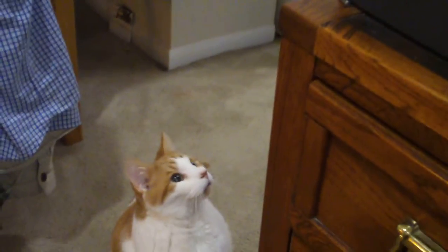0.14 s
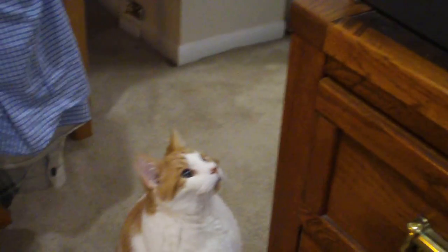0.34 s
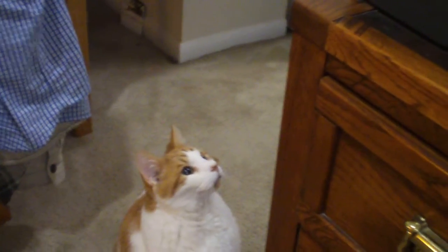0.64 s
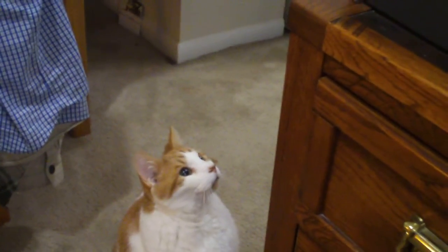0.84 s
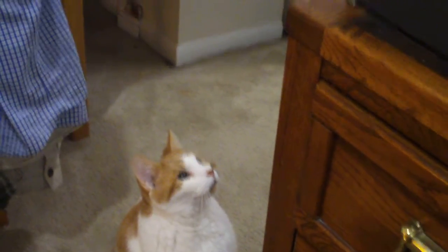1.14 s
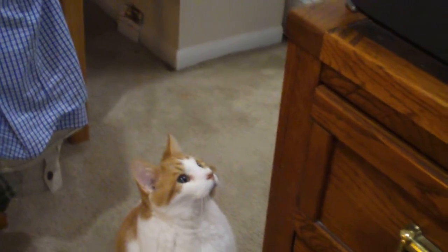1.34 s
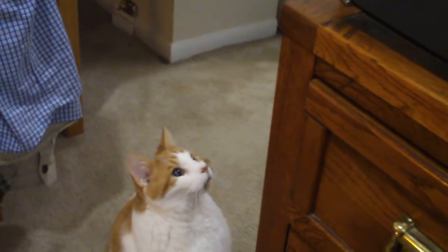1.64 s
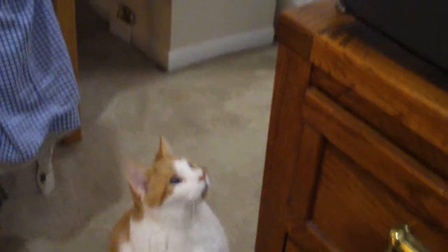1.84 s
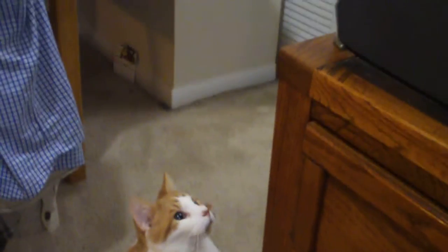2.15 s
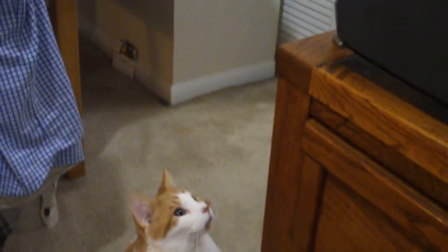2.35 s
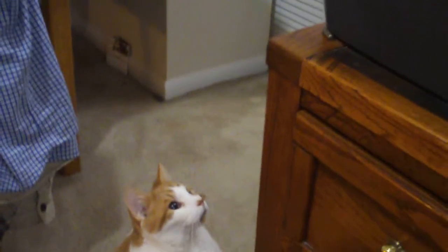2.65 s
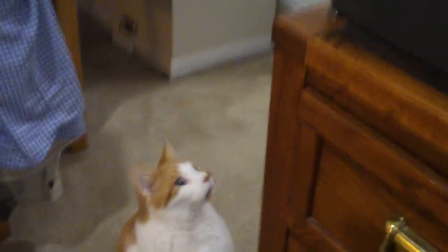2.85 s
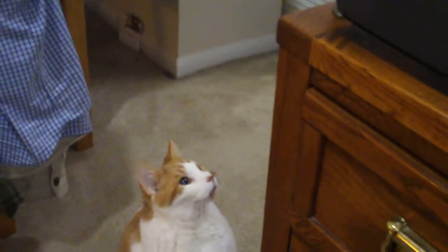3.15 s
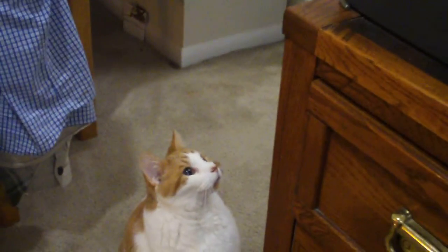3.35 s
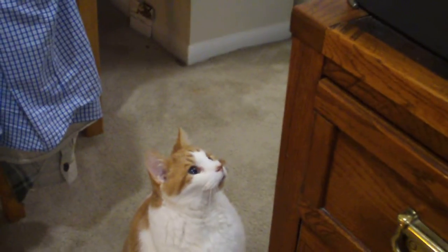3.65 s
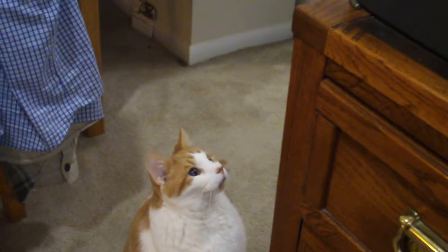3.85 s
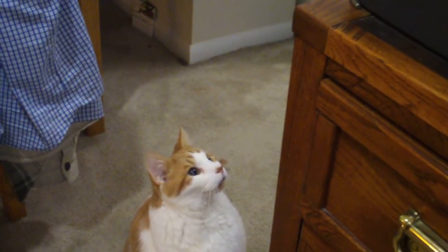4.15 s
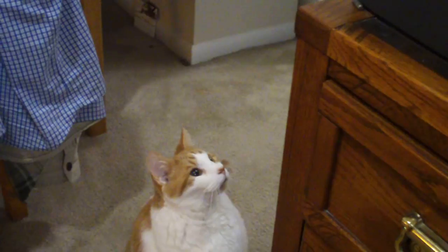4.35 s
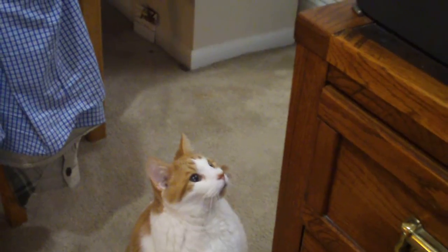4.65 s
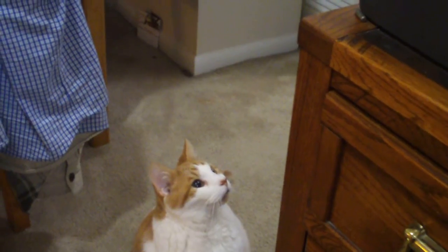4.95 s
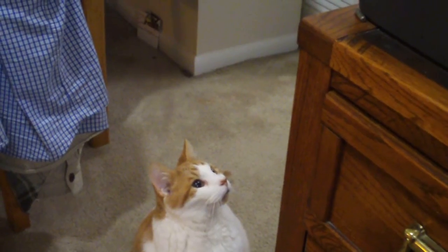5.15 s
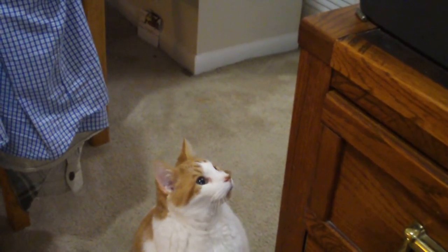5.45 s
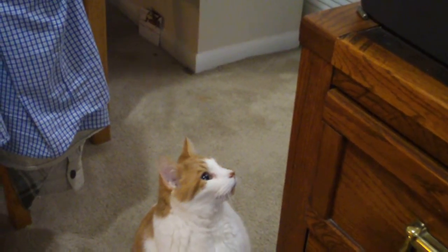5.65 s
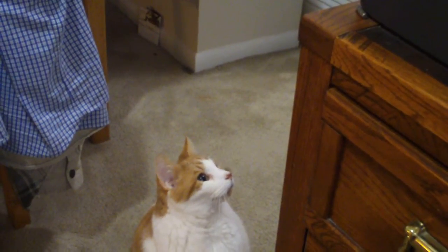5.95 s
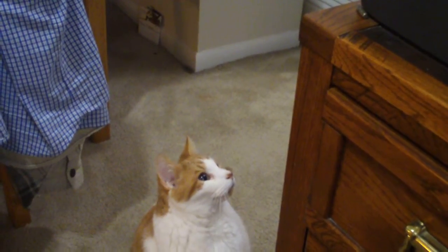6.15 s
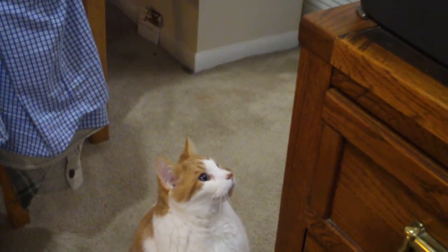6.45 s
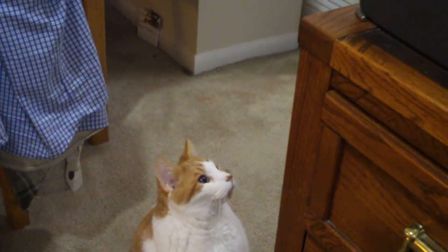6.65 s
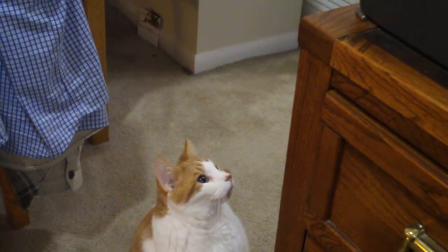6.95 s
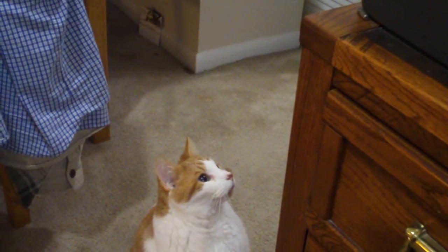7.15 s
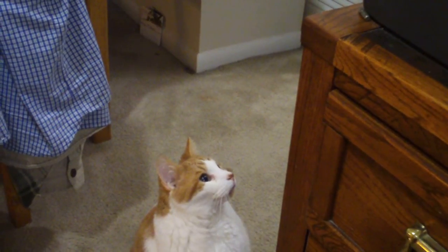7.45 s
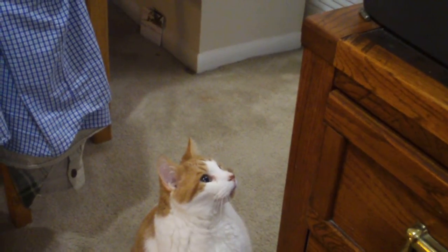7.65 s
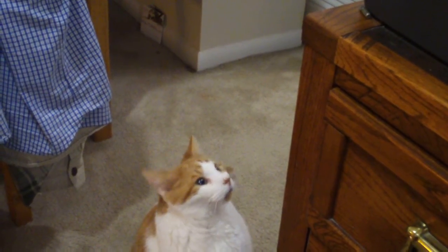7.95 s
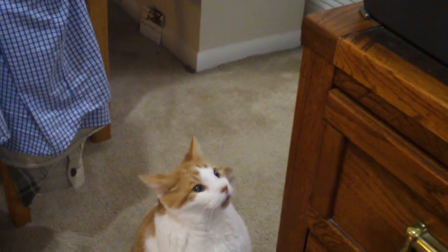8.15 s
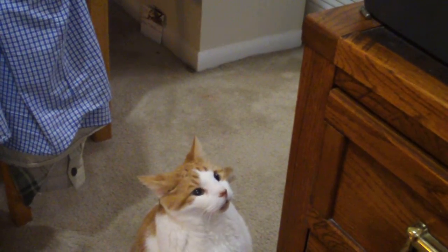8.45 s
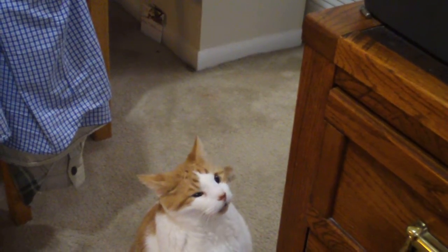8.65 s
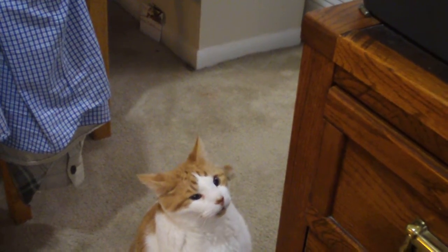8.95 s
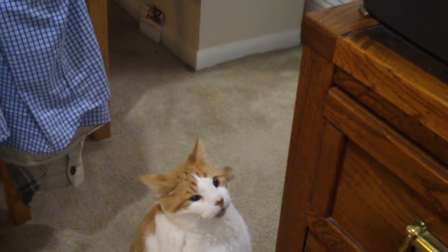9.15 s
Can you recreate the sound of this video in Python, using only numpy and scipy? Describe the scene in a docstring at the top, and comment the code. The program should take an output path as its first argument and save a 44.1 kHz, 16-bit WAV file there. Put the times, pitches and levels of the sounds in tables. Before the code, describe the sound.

A printer feeds a page indoors over constant low hum and air. Latches clack first alone, then along with a geared whir and rustling paper; brief motor jerks follow. After a longer hissing feed, a small part bounces and sharp plastic snaps peak, leaving loose parts rustling. A faint squeak and another feed lead to quiet cam scraping. The microphone is fairly near, the sound centred, the room dry.

```python
"""A low rumble and a steady fan hum fill a carpeted room, then a printer works through a page. Latches and
engaging gear teeth click as bursts of noise ringing in plastic; each blow leaves a short rustle of loose parts.
A geared feed motor makes short steps and three longer runs: hum, whine, rattle and paper hiss follow its speed.
Filtered bursts make the gear train's knocks, shaped noise makes brushing paper and turning cams. A pawl bounces
on a ringing bracket, and a roller squeaks once in gliding, fluttering partials."""
import sys
import numpy as np
from scipy import signal
from scipy.fft import rfft, irfft
from scipy.io import wavfile
from scipy.ndimage import uniform_filter1d

SR = 44100
rng = np.random.default_rng(int(sys.argv[2]) if len(sys.argv) > 2 else 0)


def generate_wav(signal):
    """Clip the signal to [-1, 1] and save it as 16-bit WAV at the path in sys.argv[1]."""
    frames = np.transpose(np.atleast_2d(signal))
    scaled = np.clip(frames, -1, 1) * 32767
    pcm = np.round(scaled).astype(np.int16)
    wavfile.write(sys.argv[1], SR, pcm)


N = 409688
TIME = np.arange(N) / SR  # seconds
BINS_HZ = np.fft.rfftfreq(N, 1 / SR)


def amp(db):
    """Decibels to gain."""
    return 10 ** (np.asarray(db) / 20)


def unit(x):
    """Scales to rms 1."""
    return x / np.sqrt(np.mean(x ** 2) + 1e-20)


def read(points, hz):
    """Reads a curve of (Hz, value) points on a log-frequency axis."""
    f, value = np.transpose(points)
    return np.interp(np.log(hz + 1), np.log(f + 1), value)


def add(mix, s, sound):
    """Mixes a sound in at time s."""
    part = mix[max(round(s * SR), 0):][:len(sound)]
    part += sound[:len(part)]


def noise(spectrum):
    """Noise of rms 1 with the given colour."""
    white = rfft(rng.standard_normal(N))
    return unit(irfft(white * amp(read(spectrum, BINS_HZ)), N))


def drift(rate_hz):
    """Random fluctuation of rms 1 around zero, changing up to about the given rate."""
    white = rfft(rng.standard_normal(N))
    return unit(irfft(white * (BINS_HZ > 0) / (1 + (BINS_HZ / rate_hz) ** 4), N))


def causal(gain_db):
    """Impulse response of energy 1 with this gain curve and no sound before the blow."""
    log_gain = np.log(amp(np.r_[gain_db, gain_db[-2:0:-1]]))
    minimum_phase = np.exp(np.conj(signal.hilbert(log_gain)))
    ring = np.fft.ifft(minimum_phase).real[:len(gain_db)]
    return ring / np.linalg.norm(ring)


def peaks(modes, hz):
    """Gain in dB of a set of resonances."""
    return sum(db / (1 + (2 * (hz - f) / width) ** 2) for f, width, db in modes)


def housed(x, modes, size=4096):
    """Passes a sound through a set of resonances."""
    gain_db = peaks(modes, np.fft.rfftfreq(size, 1 / SR))
    return signal.fftconvolve(x, causal(gain_db))[:N]


def chatter(t60, rise, size=8192):
    """Loose parts meet in a quickly dying spray of tiny, unequal impacts."""
    t = np.arange(size) / SR
    grain_db = 1.8 * unit(uniform_filter1d(rng.standard_normal(size), size=40))
    spray = unit(rng.standard_normal(size) * amp(grain_db))
    attack = 1 - np.exp(-t / max(rise, 1e-4))
    return spray * attack * np.exp(-np.log(1000) * t / max(t60, .01))


# Colours of the room's rumble and of the fan air. Each row: frequency in Hz, relative level in dB per Hz.
RUMBLE_COLOUR, AIR_COLOUR = [(8.8, -39), (15, -8), (27, 6.5), (56, 0.5), (70, -2.5), (87, -3.5), (113, -8),
                             (152, -7), (172, -4.5), (185, -13.5), (240, -15), (410, -120)], [(130, -45), (220, -0.5), (331, -10.5), (507, -10.5),
                                             (585, -15.5), (800, -18), (1010, -18.5), (1230, -20.5),
                                             (1700, -23.5), (2250, -25), (2950, -26), (4900, -32.5),
                                             (6200, -33), (7000, -36), (7980, -34.5), (8570, -39.5),
                                             (12900, -31.5), (15400, -48.5)]
# Slow ebb and swell of both. Each row: time in seconds, change of level in dB.
RUMBLE_SWELL, AIR_SWELL = [(0, -0.5), (1.5, 1.5), (3, 0), (4.2, 0.5), (6.6, 1), (7.3, 0), (7.8, 2.5),
                           (8.3, 0), (9.3, 0.5)], [(0, 1), (.8, -1), (1.9, 0.5), (2.05, 1), (2.6, -0.8),
                                                 (4.4, 0), (4.85, -1), (6, -0.5), (9.3, 0.1)]
# Stereo width of rumble and air. Each row: frequency in Hz, side over mid in dB.
AIR_WIDTH = [(25, -27), (100, -21.5), (300, -50), (1000, -69), (4000, -29), (13000, -27)]
# Steady tones of mains and fan. Each row: pitch in Hz, level in dB, rms wander of the pitch in Hz.
HUM_TONES = [(38.1, -44, 0.79), (58.9, -40, 0.983), (119.3, -51.5, 0.48), (141.2, -52, 0.44),
             (201.8, -39.5, 0.44)]
# Thin, steady whistles of the electronics: a list of pitches in Hz, and a list of levels in dB.
WHISTLE_HZ, WHISTLE_DB = [7866, 13000], [-62, -74]
RUMBLE_DB, AIR_DB = -34.5, -42  # before the swells


def background(waver_db=1.33):
    """Rumble and fan air are swelling noise, nearly the same on both sides; hum and whistles are centred sines."""
    rumble_db = RUMBLE_DB + np.interp(TIME, *np.transpose(RUMBLE_SWELL))
    air_db = AIR_DB + waver_db * drift(12) + np.interp(TIME, *np.transpose(AIR_SWELL))
    mid, side = (amp(rumble_db) * noise(RUMBLE_COLOUR) + amp(air_db) * noise(AIR_COLOUR) for _ in range(2))
    side = irfft(rfft(side) * amp(read(AIR_WIDTH, BINS_HZ)), N)
    for hz, db, wander_hz in HUM_TONES:
        turns = np.cumsum(hz + wander_hz * drift(1.4)) / SR
        mid += amp(db + 1.0 * drift(1.8)) * unit(np.sin(2 * np.pi * turns))
    for hz, db in zip(WHISTLE_HZ, WHISTLE_DB):
        mid += amp(db) * unit(np.sin(2 * np.pi * hz * TIME))
    return np.array([mid + side, mid - side])


# Broad colour of struck plastic. Each row: frequency in Hz, relative level in dB per Hz.
PLASTIC_COLOUR = [(120, -23.5), (270, 17.5), (450, 9.5), (750, 3.5), (1200, 6), (1900, -2.5), (3000, -1.5),
                  (5000, -2), (8000, -4.5), (11000, -8), (15000, -18)]
# Modes of the case. Each row: frequency in Hz, width in Hz, rise over the broad colour in dB.
CASE_MODES = [(1140, 50, 1.5), (1600, 150, 5.6), (2150, 130, 4.5), (2450, 90, 3.4), (3200, 250, 0.62),
              (5640, 120, 1.9), (6590, 110, 5.7), (9870, 320, 6.1)]
CLICK_T60_S, LINGER = 0.037, 8.5  # a slower contact rings longer, by LINGER times its attack
RING_Q = 12.5  # sharpness of the part's own ring


def click(bright_db, body_db, ring_hz, rise, ring_db, size=2048):
    """A plastic part rings at its own pitch and through the case, with body and treble raised or lowered."""
    hz = np.fft.rfftfreq(size, 1 / SR)
    case = read(PLASTIC_COLOUR, hz) + peaks(CASE_MODES, hz)
    low = 1 / (1 + (hz / 1600) ** 4)
    high = 1 - 1 / (1 + (hz / 5500) ** 4)
    own_ring = ring_db / (1 + (2 * RING_Q * (hz / ring_hz - 1)) ** 2)
    colour = case + low * body_db + high * bright_db + own_ring
    return signal.fftconvolve(chatter(CLICK_T60_S + LINGER * rise, rise), causal(colour))


# Latches, levers, and gear teeth clacking as the motor engages. Each row: start in seconds, level in dB,
# brightness in dB, body in dB, # the part's own ring in Hz, attack time constant in seconds, its sustain in dB
# against the blow.
PART_CLICKS = [(.675, -28.5, 0, -6, 5340, .0011, -19), (1.099, -27.5, -20, -8, 1140, 0.0029, -20),
               (1.316, -19, -6, -8.5, 1400, 0.0026, -24), (1.402, -22, -17, -20, 2360, .0002, -20),
               (1.495, -23, 5, -19, 5700, 0.0024, -20), (1.715, -29.5, -15, -6, 1000, 0.0026, -2),
               (2.952, -27, -3, -11, 6200, .0011, -16), (3.01, -33.5, -11, -1, 3300, .003, -18),
               (3.155, -36, -9, -2, 3420, .0032, -6), (3.195, -32, -3, 0, 2100, 0.0041, -20),
               (3.2241, -26.5, -11, -5, 3530, 0.0016, -16), (3.2773, -24.5, -18, -8, 1280, .0036, -24),
               (3.407, -37, -20, -5, 2240, .004, -20), (3.536, -30, -2, -8, 4160, 0.0046, -14),
               (3.5448, -22.5, -19, -9, 1470, .003, -8), (3.891, -31.5, -5, -6, 2830, .0022, -20),
               (4.5923, -32.5, -9, -8, 5500, 0.00091, -20), (5.3423, -23.5, -9, -13, 1580, .00025, -7),
               (5.348, -28, -20, -8, 1100, .005, 7), (5.398, -29, -16, -13, 1600, .002, -16),
               (5.502, -18.5, -9, -6, 2280, 0.0011, -12), (6.096, -33.5, -14, -8, 2120, .002, -14),
               (6.362, -41, -15, -19, 4030, .0015, -20), (6.4563, -31.5, 4, -5, 1110, .004, -24),
               (6.466, -24.5, 3, -8, 4490, .002, -12), (6.474, -20.5, -20, -1, 990, .0034, -22),
               (6.716, -33, -15, -22, 2530, 0.0043, -18), (6.8693, -32, 7, -1, 3750, .0006, -14),
               (7.005, -25.5, 3, -3, 10000, 0.0029, -22), (7.0889, -25, 3, -3, 4930, 0.0029, -26),
               (7.0978, -18, 2.5, -11.5, 6790, 0.0032, -9), (7.1089, -25.5, -10, -7, 3050, 0.0066, -19),
               (7.162, -33, -13, -4, 2900, .003, -20), (7.2437, -30, 4, -3, 1200, 0.00091, -22),
               (7.255, -17, 0, -11, 10000, 0.0026, -20), (7.2688, -11, 2.5, -8.5, 6760, .00055, -15),
               (7.3446, -26, -7, -5, 1010, 0.0052, -20), (7.392, -34.5, -8, -10, 5000, .003, -18),
               (7.539, -40, -15, -14, 4800, .002, -18), (7.621, -28, 5, 7.5, 2070, 0.0044, -7),
               (7.651, -38, -9, -6, 2220, 0.0027, -18), (7.742, -34.5, -8, -16, 5540, 0.0052, -18),
               (7.815, -38.5, -1, -4, 6350, .002, -20), (7.87, -30, 3, -12, 6800, .0006, -10),
               (7.9328, -21.5, -7, -4.5, 2530, .0034, -18), (7.9413, -22.5, 6, -3, 6640, 0.0011, -20),
               (8.0172, -24.5, -9, -8, 5520, 0.0027, -9), (8.181, -31.5, -8, -1, 3080, 0.0032, -14),
               (8.287, -20, -7, -5.5, 2400, 0.0038, -23), (8.3826, -19.5, -22, -17, 1620, .0005, -16),
               (8.442, -35, -12, -12, 2380, .001, -16), (8.477, -31, -12, -12, 1900, .001, -16)]
SUSTAIN_T60_S, SUSTAIN_FALL = 0.092, .3  # decay at 1 kHz; exponent by which higher parts die sooner
RING_DB, RING_FALL = 5, 0.15  # ring in a blow of 0 dB; dB gained for each dB that the blow is lighter


def clicks(size=8192):
    """Latches and levers snap into place and gear teeth clack as the motor engages; the springier parts ring on
    as a decaying sine."""
    out, t = np.zeros(N), np.arange(size) / SR
    for s, db, bright_db, body_db, ring_hz, rise, sustain_db in PART_CLICKS:
        add(out, s, amp(db) * click(bright_db, body_db, ring_hz, rise, RING_DB - RING_FALL * db))
        t60 = SUSTAIN_T60_S * (10 ** 3 / ring_hz) ** SUSTAIN_FALL
        fade = amp(sustain_db - 60 * t / t60) * (1 - np.exp(-t / max(rise, 1e-4)))
        add(out, s, amp(db) * fade * np.sin(2 * np.pi * ring_hz * t))
    return out


# Rustle of loose parts and turning cams. Each row: frequency in Hz, relative level in dB per Hz.
RUSTLE_COLOUR = [(300, -13), (1000, 4), (2500, -3), (6000, -1), (10000, -9.5), (15000, -19)]


def shaken(blows, shake_db=-10.0, shake_t60=0.36, uneven_db=3, shake_hz=5200):
    """Each blow, its finest treble softened, leaves loose parts in the case rustling for a moment."""
    keep = np.exp(-2 * np.log(1000) / (shake_t60 * SR))  # share of power left after one sample
    push = signal.lfilter(*signal.butter(1, shake_hz, fs=SR), blows)
    power = signal.lfilter([1 - keep], [1, -keep], push ** 2)
    rustle = unit(noise(RUSTLE_COLOUR) * amp(uneven_db * drift(40)))
    return amp(shake_db) * np.sqrt(power) * rustle


# Moves of the feed motor. Each row: start in seconds, stop in seconds, gear mesh rate in Hz,
# gears in dB and paper hiss in dB (both before the resonances and their trim), whine in dB against the gears.
FEED_MOVES = [(1.313, 1.694, 327, -40, -41, -6.5), (1.756, 1.84, 328, -48, -43.5, -10),
              (2.825, 2.909, 377, -43, -37.5, 1), (3.268, 3.378, 368.4, -40, -37, -4),
              (3.9, 3.99, 358, -45.5, -50, -12), (3.977, 4.061, 367.6, -39, -38, -6),
              (4.43, 4.513, 360, -42, -40, -15), (5.025, 5.789, 344, -40, -34.5, -6.5),
              (6.047, 6.146, 355, -51, -47.5, -10), (6.177, 6.288, 381, -39.5, -38.5, -15),
              (8.283, 8.675, 330, -40, -41, -5.5), (8.702, 8.787, 366.5, -43, -40, -3),
              (9.102, 9.193, 359, -43, -41.5, -8)]
# Hum of the gears. Each row: multiple of the mesh rate, relative level in dB.
GEAR_PARTIALS = [(1, -5), (1.5, -18), (2, -12.5)]
# Rattle of the gear train and hiss of sliding paper. Each row: frequency in Hz, relative level in dB per Hz.
RATTLE_COLOUR, PAPER_COLOUR = [(200, -15), (300, -1.5), (400, -4.5), (520, -4.5), (740, -12), (900, -9),
                               (1100, -5.5), (1350, -6.5), (1550, -7.5), (1900, -18), (2600, -35)], [(1120, -16.5), (1900, 0), (2020, -5), (2410, -1.5),
                                               (2650, -2.5), (3630, 1), (4180, -1), (4980, -3.5),
                                               (5730, -2.5), (8340, -4), (9110, -7), (9940, -5),
                                               (11200, -9.5), (13600, -12.5), (15400, -22)]
# Resonances of the housing round the gears and of the paper path. Each row: frequency in Hz, width in Hz, gain in dB.
HOUSING_MODES, PAPER_PATH_MODES = [(322, 33, 6.5), (453, 44, 1.5), (535, 52, 4.5), (640, 49, 6),
                                   (816, 48, 11), (1015, 28, 4), (1127, 39, 6.5), (1230, 44, 5.5),
                                   (1507, 53, 6)], [(1990, 160, -2), (2280, 240, 4), (4240, 200, 3),
                                                    (5530, 240, 4.5), (6300, 480, 4.5), (7250, 180, 0.5),
                                                    (10000, 450, 2), (12300, 400, 3.5)]
RAMP_S, SETTLE_S = .034, 0.097  # run-up and braking time; time constant of steadying and of the hum's build-up
START_WOBBLE, SETTLED_WOBBLE = .018, .004  # rms share by which the speed varies
GEAR_HUM_DB = -2.5  # settled hum, against the rattle
COAST_S, COAST_DB = 0.027, -7.5  # loose gears rattle on after a stop: time constant, level against the running gears


def feed(tooth_depth=0.21, flutter_db=0.2, grain_db=0.9, housing_db=-2.0, chute_db=-0.2,
         rattle_rough_db=1.0, whine_order=3):
    """The motor ramps up, settles and brakes; hum, whine, rattle and paper hiss follow its speed."""
    gears, sheet = np.zeros(N), np.zeros(N)
    rattle = noise(RATTLE_COLOUR) * amp(rattle_rough_db * drift(67))
    paper = noise(PAPER_COLOUR) * amp(flutter_db * drift(41) + grain_db * drift(670))
    wobble = drift(60)
    load = unit(amp(1.1 * drift(14)))
    for start, stop, mesh_hz, gears_db, hiss_db, whine_db in FEED_MOVES:
        on = (TIME > start) & (TIME < stop)
        from_rest = np.minimum(TIME[on] - start, stop - TIME[on])
        speed = np.sin(np.pi / 2 * np.clip(from_rest / RAMP_S, 0, 1))
        settled = 1 - np.exp(-(TIME[on] - start) / SETTLE_S)
        unsteady = START_WOBBLE + (SETTLED_WOBBLE - START_WOBBLE) * settled
        angle = 2 * np.pi * np.cumsum(mesh_hz * speed * (1 + unsteady * wobble[on])) / SR
        hum = unit(sum(amp(db) * np.sin(k * angle + 2 * np.pi * rng.random()) for k, db in GEAR_PARTIALS))
        whine = amp(whine_db) * unit(np.sin(whine_order * angle))
        tones = load[on] * (amp(GEAR_HUM_DB) * settled * hum + whine)
        teeth = 1 + tooth_depth * np.cos(angle)  # each meshing tooth jerks the gear train
        gears[on] += speed * amp(gears_db) * (speed * tones + teeth * rattle[on])
        sheet[on] += speed * amp(hiss_db) * paper[on]
        after = TIME >= stop
        coast = np.exp((stop - TIME[after]) / COAST_S)
        gears[after] += amp(gears_db + COAST_DB) * coast * rattle[after]
    return amp(housing_db) * housed(gears, HOUSING_MODES) + amp(chute_db) * housed(sheet, PAPER_PATH_MODES)


# The gear train takes up or drops its load. Each row: start in seconds, level in dB, 60 dB decay in seconds.
LOAD_KNOCKS = [(1.41, -21, 0.061), (1.426, -22.5, 0.044), (1.501, -40, 0.16), (1.644, -27.5, 0.054),
               (1.656, -32, 0.066), (5.504, -34, 0.086), (5.742, -26, 0.075), (6.474, -34, .28),
               (7.272, -33, 0.23), (8.395, -22, 0.068), (8.412, -31, .08), (8.624, -25, 0.041),
               (8.637, -26.5, .055)]
# Colour of the printer's frame. Each row: frequency in Hz, relative level in dB per Hz.
FRAME_COLOUR = [(150, -8), (300, 5.5), (560, 12.5), (760, 3), (1050, 10.5), (1500, -4.5), (2500, 1),
                (5000, -42), (12000, -75)]


def knocks(rise=0.00081, size=2048):
    """Soft, dull blows of the gear train ring through the printer's frame."""
    out = np.zeros(N)
    frame = causal(read(FRAME_COLOUR, np.fft.rfftfreq(size, 1 / SR)))
    for s, db, t60 in LOAD_KNOCKS:
        add(out, s, amp(db) * signal.fftconvolve(chatter(t60, rise), frame))
    return out


# The sheet's edge brushes past the guides. Each row: middle in seconds, length in seconds, level in dB.
EDGE_SWISHES = [(1.472, 0.024, -31.5), (1.515, 0.062, -36.5), (8.453, 0.019, -32.5), (8.494, 0.048, -33.5)]
# Colour of the brushing edge. Each row: frequency in Hz, relative level in dB per Hz.
EDGE_COLOUR = [(1500, 1), (3500, 1), (6000, -2.5), (10000, 1), (13000, -5.5), (15500, -14)]


def swishes(grain_db=4.0):
    """The paper's edge brushes by: bright, grainy noise under bell-shaped swells."""
    level = sum(amp(db) * np.exp(-(2 * (TIME - s) / length) ** 2) for s, length, db in EDGE_SWISHES)
    return level * unit(noise(EDGE_COLOUR) * amp(grain_db * drift(330)))


# The cams turn over. Each row: start in seconds, stop in seconds, rustle in dB.
CAM_TURNS = [(2.972, 3.1, -48), (3.15, 3.437, -50.5), (3.56, 4.62, -55), (5.79, 6.82, -56),
             (7.28, 8.25, -59.5), (8.798, 9.293, -55)]
# Range in which the small parts ring: lowest and highest pitch in Hz.
TICK_RANGE_HZ = (1100, 5070)
TICKS_PER_S, TICK_DB, TICK_SPREAD_DB = 6.7, 5, 7  # mean rate; level against the rustle; its spread either way


def cams(uneven_db=3.0, grain_db=2, fade_s=0.018):
    """Cams and rollers scrape lightly and unevenly as they turn, and small parts tick at random."""
    level = 0
    for start, stop, db in CAM_TURNS:
        level = level + amp(db) * np.clip(np.minimum(TIME - start, stop - TIME) / fade_s, 0, 1)
    out = unit(noise(RUSTLE_COLOUR) * amp(uneven_db * drift(16) + grain_db * drift(500)))
    times = TIME[rng.random(N) < TICKS_PER_S / SR]
    for s, (strength, pitch) in zip(times, rng.uniform(-1.03, 1, (len(times), 2))):
        ring_hz = np.interp(pitch, (-1, 1), TICK_RANGE_HZ)
        tick = click(bright_db=15, body_db=-2, ring_hz=ring_hz, rise=0.0017, ring_db=14)
        add(out, s, amp(TICK_DB + TICK_SPREAD_DB * strength) * tick)
    return level * out  # ticks are heard only while the cams turn


# A sprung pawl drops and rebounds. Each row: start in seconds, snap in dB, brightness in dB, bracket ring in dB.
PAWL_HITS = [(6.8893, -20, 1, -19), (6.9372, -28, -2, -23.5), (6.9749, -30, -2, -24.5)]
# Ring of pawl and bracket. Each row: frequency in Hz, level in dB against the bracket ring, 60 dB decay in seconds.
BRACKET_MODES = [(180, -7, .15), (280, -8.5, 0.19), (458, -17, 0.17), (1130, -16, .07), (2070, -9, 0.095),
                 (2310, -19, .06), (2520, -14, .05), (2700, -19, .05)]


def pawl(body_db=-7, rise=.001, size=8192):
    """The pawl hits its stop and bounces twice; its bracket rings each time as a set of decaying sines."""
    out, t = np.zeros(N), np.arange(size) / SR
    for s, db, bright_db, bracket_db in PAWL_HITS:
        add(out, s, amp(db) * click(bright_db, body_db, ring_hz=2420, rise=rise, ring_db=9))
        ring = np.zeros(size)
        for hz, mode_db, t60 in BRACKET_MODES:
            ring += amp(mode_db - 60 * t / t60) * np.sin(2 * np.pi * (hz * t + rng.random()))
        add(out, s, amp(bracket_db) * ring * (1 - np.exp(-t / 0.0011)))
    return out


# A roller rubs and squeaks along a glide. Each row: time in seconds, pitch in Hz, level in dB.
SQUEAK_GLIDE = [(8.07, 1684, -64), (8.092, 1715, -43), (8.125, 1765, -44), (8.155, 1785, -44),
                (8.17, 1990, -42.5), (8.192, 1830, -41), (8.225, 1815, -62)]
# Partials of the squeak. Each row: multiple of the pitch, relative level in dB.
SQUEAK_PARTIALS = [(1, -5), (2, -7), (3, -10)]


def squeak(rub_db=-5):
    """Rubber sticks and slips on paper: a hoarse chirp with fluttering partials, inside a faint rubbing hiss."""
    s, hz, db = np.transpose(SQUEAK_GLIDE)
    slip = 1 + .032 * drift(550)  # fast pitch jitter makes it hoarse
    angle = 2 * np.pi * np.cumsum(np.interp(TIME, s, hz) * slip) / SR
    sound = amp(rub_db) * noise(PAPER_COLOUR)
    for k, partial_db in SQUEAK_PARTIALS:
        grip = unit(amp(4.5 * drift(130)))
        sound += amp(partial_db) * grip * np.sin(k * angle)
    return np.interp(TIME, s, amp(db), left=0, right=0) * sound


# Decay of the carpeted room. Each row: frequency in Hz, 60 dB decay in seconds.
ROOM_DECAY = [(100, 0.1), (500, 0.17), (2000, 0.15), (6000, 0.3), (14000, 0.18)]


def room(x, size=256):
    """Diffuse reflections: each band stores the sound's power, lets it die away and returns it with random phase."""
    hz, _, z = signal.stft(x, SR, nperseg=size)
    keep = np.exp(-np.log(1000) * size / SR / read(ROOM_DECAY, hz))  # share of power left after half a frame
    stored = np.array([signal.lfilter([0, 1 - k], [1, -k], abs(band) ** 2) for k, band in zip(keep, z)])
    scatter = rng.standard_normal(z.shape[::-1]) + 1j * rng.standard_normal(z.shape[::-1])
    return signal.istft(np.sqrt(stored) * scatter.T, SR)[1][:N]


def scene(wet_db=-8, wide_db=-31):
    """The printer stands ahead; only its reflections differ a little between left and right."""
    air = background()
    blows = clicks() + pawl()
    printer = blows + shaken(blows) + feed() + knocks() + swishes() + cams() + squeak()
    side = amp(wide_db) * room(printer)
    return printer + amp(wet_db) * room(printer) + np.array([side, -side]) + air


# Steady offset from zero. Each row: one channel's offset as a share of full scale, left then right.
CHANNEL_OFFSET = [
    [-.17],
    [.17],
]
CUT_HZ = 15550


def record(dry):
    """A steep low-pass limits the band; the two channels rest at opposite steady offsets from zero."""
    lowpass = signal.firwin(511, CUT_HZ, window=("kaiser", 9), fs=SR)
    limited = signal.oaconvolve(dry, lowpass[None], "same")
    return limited + np.array(CHANNEL_OFFSET)


dry = scene()
out = record(dry)
generate_wav(out)
```